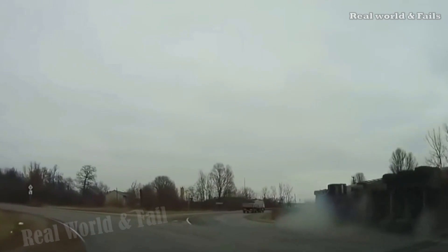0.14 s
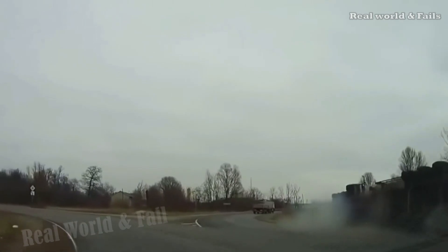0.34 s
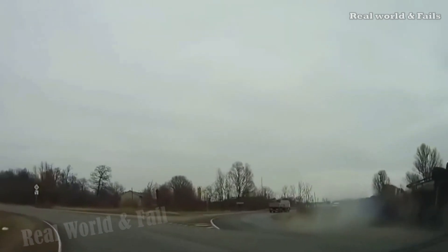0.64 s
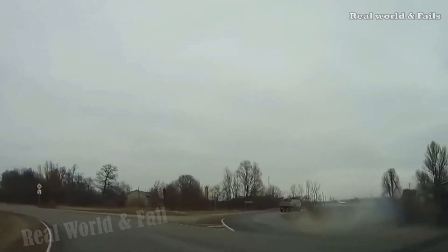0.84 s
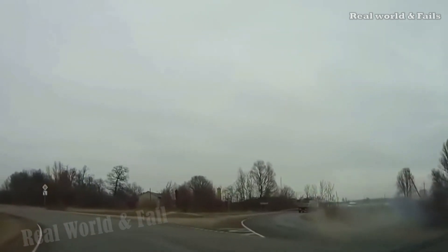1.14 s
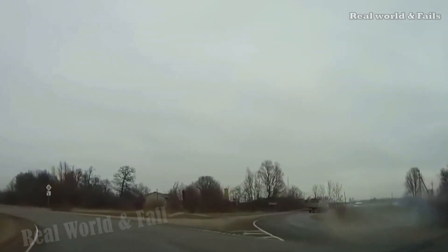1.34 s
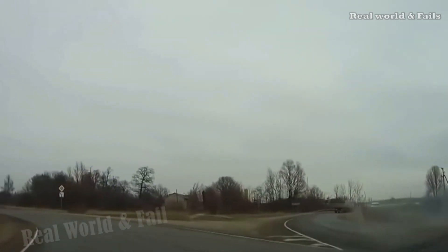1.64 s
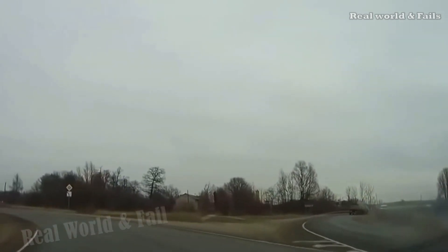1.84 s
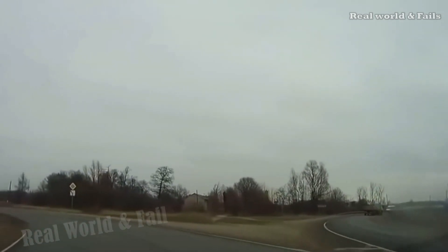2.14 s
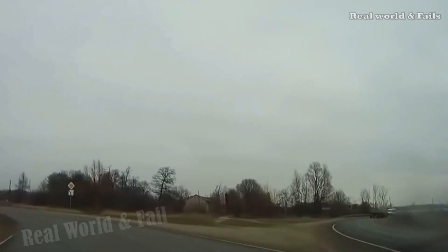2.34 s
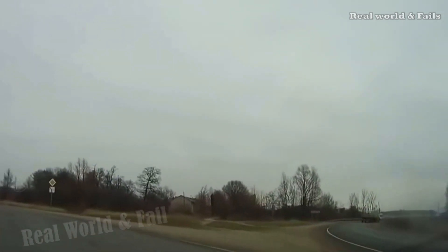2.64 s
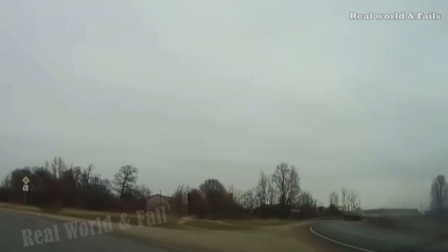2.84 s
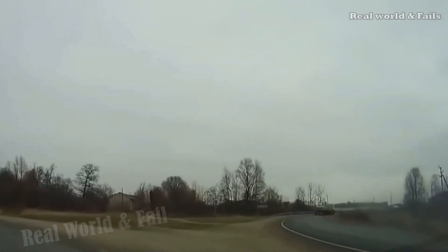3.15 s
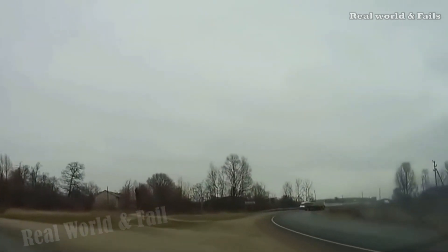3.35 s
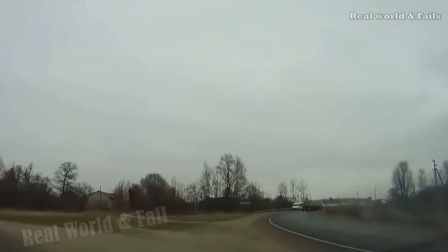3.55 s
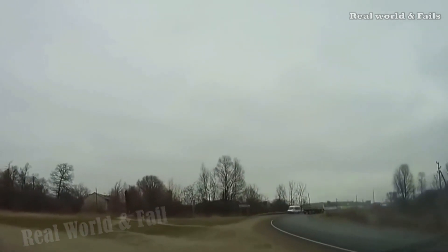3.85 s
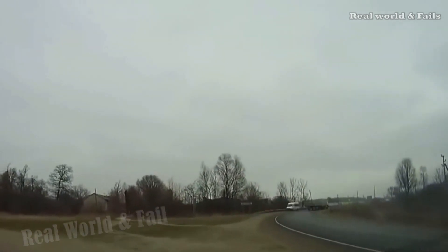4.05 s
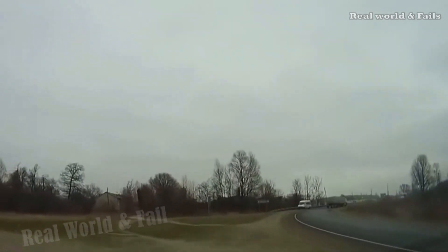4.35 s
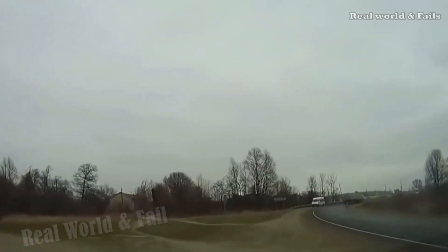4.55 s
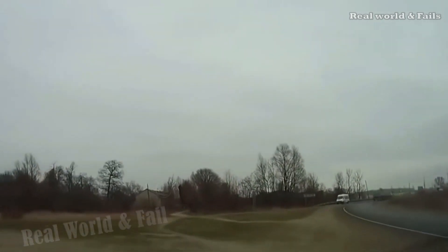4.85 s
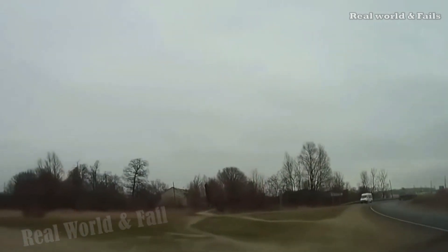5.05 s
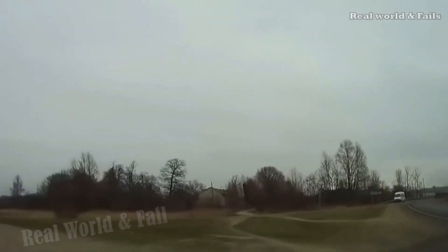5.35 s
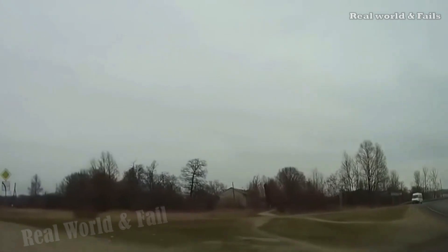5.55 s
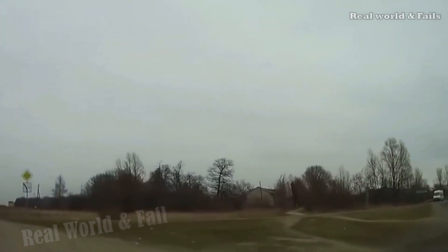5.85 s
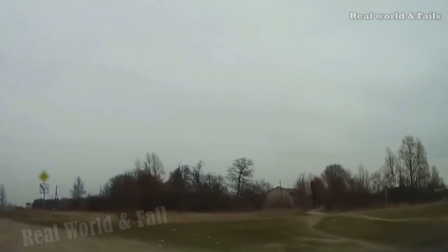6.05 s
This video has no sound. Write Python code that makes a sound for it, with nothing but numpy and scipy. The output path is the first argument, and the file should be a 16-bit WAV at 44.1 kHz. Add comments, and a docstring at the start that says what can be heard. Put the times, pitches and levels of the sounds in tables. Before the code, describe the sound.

From inside a moving car, a heavy overturned truck slides past close by: hollow shuddering boom, groaning steel, then an overloading slam with cracks and rattling panels. More lurches and knocks follow as the scrape turns from asphalt to gritty verge and dies quickly. A low engine drone and wide road rumble carry on, easing into a cruise with faint ticks, and dull wheel bumps come late.

```python
"""Inside a car that pulls through a turn past an overturned truck sliding along the road.
The truck groans, clatters and slams down, built from ringing noise, shuddering lows and sliding tones.
It overloads the microphone, scrapes on from asphalt to the gritty verge, and dies away as it slows.
The car eases into a cruise: engine harmonics climb under shaped noise for the road and tyres.
Small ticks sound in the cabin, and late on the wheels drop over bumps."""
import sys
import numpy as np
from scipy import signal
from scipy.fft import rfft, irfft
from scipy.io import wavfile
from scipy.ndimage import uniform_filter1d

SR = 44100
rng = np.random.default_rng(int(sys.argv[2]) if len(sys.argv) > 2 else 0)


def to_wav(s):
    """Save 16-bit WAV."""
    ch = np.atleast_2d(s).T  # columns
    pcm = np.round(np.clip(ch, -1, 1) * 32767)  # PCM
    wavfile.write(sys.argv[1], SR, pcm.astype(np.int16))


N = 272979
T = np.arange(N) / SR
HZ = np.fft.rfftfreq(N, 1 / SR)

# Every colour table is a spectrum curve, relative per Hz: freq_hz, level_db
# colours of the hollow truck body: sliding, and slamming down
BOOM_COLOUR = [(12, -36.5), (22, -1.5), (32, -4.5), (46, 6.5), (58, -2), (70, -16), (95, -12), (110, -4),
               (135, -16), (155, -19.5), (300, -98.5)]
SLAM_COLOUR = [(20, -21), (42, 8.5), (75, 1.5), (125, -5), (170, -18.5), (400, -20), (900, -67)]
# colour of the truck's rattling body
CLATTER_COLOUR = [(100, -33), (170, -1.5), (215, 1.5), (280, -3), (450, -3), (520, -15.5), (640, -7.5),
                  (760, -13), (1250, -19.5), (1700, -25), (2400, -33), (5000, -67)]
# colours of bare steel on asphalt, grit dragged under it, and grit flung against the glass
STEEL_COLOUR = [(500, -14), (1200, 6), (1800, 5.5), (2400, -7.5), (3200, -5.5), (4000, -14), (5000, -4),
                (6100, -13.5), (7200, -14), (8300, -29), (10000, -38), (16000, -48)]
GRIT_COLOUR = [(500, -11.5), (1300, 4.5), (2200, 2), (3200, 5.5), (4000, 3), (5200, -4.5), (6300, -11.5),
               (7200, -30.5), (8500, -40), (10000, -43.5), (16000, -51.5)]
SPRAY_COLOUR = [(500, -18), (1300, 5.5), (2200, 10.5), (3200, 4.5), (4000, 4.5), (5200, 3), (6400, -12.5),
                (7300, -50), (8500, -42), (16000, -46.5)]
# colours of road rumble and tyre roar: common to both sides, and differing between them
RUMBLE_COLOUR = [(15, -12.5), (33, -3.5), (55, -4), (74, 0), (88, -5.5), (115, 1.5), (150, -10.5),
                 (225, -7.5), (260, -10), (390, -12.5), (520, -19), (650, -22), (760, -40.5), (1500, -82.5)]
RUMBLE_SIDE_COLOUR = [(20, -21), (52, -6), (64, -13), (88, -4), (115, 3), (142, -9), (220, -3),
                      (280, -11.5), (420, -5.5), (560, -10.5), (700, -23.5), (1200, -64.5)]
TYRE_COLOUR = [(300, -31.5), (620, -16.5), (745, -6), (900, 0.5), (1200, -4), (1500, -16), (1830, -16.5),
               (1980, -21), (3200, -26.5), (4400, -39.5), (7000, -46.5), (9000, -55.5), (15500, -45.5)]
TYRE_SIDE_COLOUR = [(300, -22), (600, -9), (740, -6.5), (820, 4.5), (930, -1), (1250, -4.5), (1480, -12),
                    (1950, -14), (3300, -32), (4300, -43.5), (7000, -51.5), (9000, -57), (15500, -50)]
# colour of the tread's hiss
HISS_COLOUR = [(1200, -14.5), (2600, 1), (3400, -0.5), (4300, -12.5), (6500, -22), (9000, -36.5)]

# the truck digs into the road: start_s, hold_s, release_s, boom_db, clatter_db, scrape_db
DIGS = [(0.095, 0.19, .035, -23, -20.5, -36.5), (0.175, .1, 0.018, -17, -13, -29.5),
        (0.25, 0.0089, 0.011, -3, -17, -23), (0.343, 0.034, 0.012, -7.5, -30.5, -57),
        (0.515, 0.028, 0.083, -7.5, -19, -36), (0.624, 0.052, 0.026, -22, -27, -35),
        (0.788, 0.14, 0.043, -30.5, -19, -36.5), (0.888, 0.044, 0.036, -8.5, -22.5, -36.5),
        (0.976, .02, .02, -33, -34, -38.5), (1.116, .03, 0.028, -34, -34, -28.5),
        (1.195, 0.078, 0.031, -30, -34.5, -47.5)]
# heavy lurches of the truck's body: start_s, level_db, pitch_hz
LURCHES = [(.105, -7, 133), (.255, -8.5, 125.3), (.275, -20, 240.7), (0.329, -4, 37.1), (.51, -9, 47),
           (0.716, -6.5, 35.2), (.84, -18.5, 279), (0.886, -6, 131.6), (0.906, -9, 43.4)]
# knocks of the body on the road, before the panels ring: start_s, level_db
KNOCKS = [(0.116, -17.5), (.2, -25.5), (0.244, -10.5), (0.267, -26), (.305, -8.5), (.495, -20.5),
          (0.541, -34.5), (.647, -9), (0.691, -17.5), (0.848, -15.5), (.93, -22)]
# ringing of the truck's panels: pitch_hz, relative level_db, t60_s
PANELS = [(280.4, 3, 0.24), (380, -12, 0.037), (471, 6, 0.12), (514, 3, 0.11), (580, -12.5, 0.12),
          (636, -4, 0.1), (688, 3, 0.04), (807, -7.5, 0.2), (940, -14.5, 0.037), (1063, -6.5, .1),
          (1154, -9.5, 0.28), (1250, -13, 0.16), (1434, -11, .11), (1710, -13, 0.1), (1853, -11, 0.081),
          (1950, -17, .1), (2616, -14.5, .08), (3140, -17.5, 0.043), (5030, -22, .06)]
# sprays of grit: start_s, length_s, level_db
SPRAYS = [(0.193, 0.027, -40), (0.233, 0.038, -22.5), (0.62, 0.038, -51.5), (0.926, 0.022, -32.5),
          (1.113, 0.096, -37), (1.407, 0.023, -49), (1.467, 0.064, -50.5)]
# groans and squeals of dragged steel: start_s, hold_s, pitch_hz, level_db
JUDDERS = [(0, 0.46, 224.3, -24.5), (0.179, 0.037, 655, -18.5), (0.645, 0.1, 222.6, -20.5),
           (0.798, 0.072, 205, -25)]
# cracks of breaking parts: start_s, level_db, centre_hz
CRACKS = [(.2355, -22, 2320), (.245, -20, 1800), (.2505, -21, 5570), (.254, -17, 2785), (.2605, -11, 1500),
          (.2685, -9, 4960), (.2742, -22, 2600), (.2875, -20, 5490), (.305, -17, 1500)]
# engine harmonics: multiple of the firing rate, pulling_db, cruising_db
ENGINE_ORDERS = [(1, -25, -40), (2, -33, -37.5), (3, -66.5, -45), (4, -38, -53)]
# the car's wheels drop over bumps: start_s, level_db, pitch_hz
BUMPS = [(4.42, -18.5, 59), (4.725, -24, 107), (5.79, -19, 48), (5.875, -17, 63.7)]
# small ticks of flying grit and cabin trim: start_s, level_db, centre_hz
TICKS = [(.837, -48, 9900), (1.247, -58, 10100), (2.465, -63, 5030), (2.836, -59, 5200),
         (2.93, -63.5, 6350), (3.135, -65, 9000), (4.755, -69, 13600), (4.757, -55, 5600)]

# the truck's speed past the car, its closest distance and when; its drag fades once it slows
PASS_M_PER_S, DISTANCE_M, PASS_S = 10.7, 5.8, 0.18
SLOWING_S, SLOWING_DB_PER_S = 1.144, 51
# steady drag at the closest point; the scrape's also follows the settling and the verge
DRAG_BOOM_DB, DRAG_CLATTER_DB, DRAG_SCRAPE_DB = -9.5, -23, -39.5
DIG_ATTACK_S = 0.014
# the heaviest blow
SLAM_S, SLAM_DB, SLAM_ATTACK_S, SLAM_HOLD_S, SLAM_RELEASE_S = .225, 9, 0.016, 0.0027, 0.035
# the drag's scrape starts SETTLE_DB down and builds as the truck's weight comes down on the road
SETTLE_S, SETTLE_DB = 0.38, 11
# at the verge grit takes over (share 0-1 before and after) and the drag's scrape gets louder
VERGE_FROM_S, VERGE_TO_S, GRIT_ROAD, GRIT_VERGE, VERGE_DB = .58, .71, 0.084, 0.92, 2
JUDDER_ATTACK_S, JUDDER_RELEASE_S = 0.029, 0.042
JUDDER_SAG = 0.0409  # share of the pitch lost over attack and hold
# splinters crackle around the slam
SPLINTER_S, SPLINTER_HOLD_S, SPLINTER_RELEASE_S, SPLINTER_DB = .19, .11, .008, -51.5
# the engine's firing rate climbs towards a top value, with this time constant
FIRING_START_HZ, FIRING_TOP_HZ, SPEED_UP_S = 51.88, 63.4, 5.0
# the car pulls through the turn, then eases into a cruise
EASE_FROM_S, EASE_TO_S = 1.42, 3.01
# road noise: base level at the start, growth with speed, and extra while pulling through the turn
RUMBLE_DB, RUMBLE_DB_PER_S, RUMBLE_TURN_DB = -29.5, 0.4329, 6
TYRES_DB, TYRES_DB_PER_S, TYRES_TURN_DB = -51, 1.5, 5.5
HISS_DB, HISS_DB_PER_S = -89.5, 5.5
# upper edge of the microphone's band
EDGE_HZ = 16200


def boom():
    """The hollow truck body shudders as it slides, lurches, and slams down once."""
    body = shudder(BOOM_COLOUR, size=1800) * sliding(DRAG_BOOM_DB, dig_layer=0)
    slam_swell = swell(SLAM_S, SLAM_ATTACK_S, SLAM_HOLD_S, SLAM_RELEASE_S)
    slam = amp(SLAM_DB) * shudder(SLAM_COLOUR, size=1300) * slam_swell
    return body + thuds(LURCHES, swell_s=0.025) + slam


def clatter():
    """Knocks and a dense rattle of small blows ring the truck's panels."""
    blows = grains(per_s=370, spread_db=2.0) * sliding(DRAG_CLATTER_DB, dig_layer=1)
    t = T[:SR // 4]
    for start_s, level_db in KNOCKS:
        knock = rng.standard_normal(len(t)) * np.exp(-t / 0.029)
        add(blows, start_s, amp(level_db) * knock)
    ring = np.zeros(len(t))
    for pitch_hz, level_db, t60_s in PANELS:
        ring += amp(level_db - 60 * t / t60_s) * np.sin(2 * np.pi * (pitch_hz * t + rng.random()))
    ringing = signal.fftconvolve(blows, ring / np.linalg.norm(ring))[:N]
    rattle = blows.std() * colour(blows, CLATTER_COLOUR)
    return muffled(amp(-7.5) * ringing + amp(-2.0) * rattle, cut_hz=5200)


def scrape():
    """Steel grinds over asphalt, then grit, in uneven slips, and throws sprays of it."""
    verge = ramp(VERGE_FROM_S, VERGE_TO_S)
    unsettled = 1 - ramp(0, SETTLE_S)
    drag_db = DRAG_SCRAPE_DB + VERGE_DB * verge - SETTLE_DB * unsettled
    force = sliding(drag_db, dig_layer=2) * amp(1.5 * wander(40))
    steel = colour(patchy(grains(per_s=3200, spread_db=2.0), depth_db=3.5), STEEL_COLOUR)
    grit = colour(patchy(grains(per_s=7000, spread_db=2.0), depth_db=2.5), GRIT_COLOUR)
    grit_share = GRIT_ROAD + (GRIT_VERGE - GRIT_ROAD) * verge
    ground = np.sqrt(1 - grit_share) * steel + np.sqrt(grit_share) * grit
    return force * ground + sprays()


def sprays():
    """Flung grit strikes in short showers of equal-sized clicks."""
    strength = np.zeros(N)
    for start_s, length_s, level_db in SPRAYS:
        add(strength, start_s, amp(level_db) * signal.windows.tukey(int(length_s * SR), .45))
    return strength * colour(grains(per_s=3400, spread_db=0.0), SPRAY_COLOUR)


def judder(rough):
    """Dragged steel sticks and slips at a rough pitch that sinks as it slows."""
    out = np.zeros(N)
    waver = 1 + rough * wander(64)
    for start_s, hold_s, pitch_hz, level_db in JUDDERS:
        sag = 1 - JUDDER_SAG * ramp(start_s, start_s + JUDDER_ATTACK_S + hold_s)
        cycles = np.cumsum(pitch_hz * waver * sag) / SR
        envelope = swell(start_s, JUDDER_ATTACK_S, hold_s, JUDDER_RELEASE_S)
        out += amp(level_db) * envelope * np.sin(2 * np.pi * cycles)
    return out * amp(2.7 * wander(20))


def breaking():
    """Parts crack in short, broadly tuned bursts, dulled on the way into the car."""
    return muffled(snaps(CRACKS, sharpness=2, decay_s=.0018), cut_hz=7000)


def splinters():
    """Small parts shatter in sparse bright clicks."""
    bright = [(2000, -20), (5500, 0), (9000, -4), (15500, -6)]  # freq_hz, level_db
    clicks = colour(grains(per_s=400, spread_db=3), bright)
    envelope = swell(SPLINTER_S, .005, SPLINTER_HOLD_S, SPLINTER_RELEASE_S)
    return amp(SPLINTER_DB) * envelope * clicks


def engine():
    """Low harmonics of the firing rate make a drone that changes tone as the load eases."""
    climb = np.exp(-T / SPEED_UP_S)
    firing_hz = FIRING_TOP_HZ + (FIRING_START_HZ - FIRING_TOP_HZ) * climb
    firings = np.cumsum(firing_hz * (1 + 0.0094 * wander(17.4))) / SR
    load = pulling()
    drone = np.zeros(N)
    for order, pull_db, cruise_db in ENGINE_ORDERS:
        level_db = cruise_db + load * (pull_db - cruise_db) + 3.1 * wander(15)
        tone = np.sqrt(2) * np.sin(2 * np.pi * (order * firings + rng.random()))  # rms 1
        drone += amp(level_db) * tone
    return drone * amp([[-1.2], [1.2]])  # left, right


def road():
    """Rumble comes up through the suspension; tread roar comes through the glass, brightening with speed."""
    turn = pulling()
    rumble_db = RUMBLE_DB + RUMBLE_DB_PER_S * T + RUMBLE_TURN_DB * turn + 0.82 * wander(31)
    tyres_db = TYRES_DB + TYRES_DB_PER_S * T + TYRES_TURN_DB * turn + .5 * wander(25)
    rumble = cabin_pair(noise(), RUMBLE_COLOUR, RUMBLE_SIDE_COLOUR, side_db=-10.5, lead=.12)
    roar = patchy(noise(), depth_db=1.7)
    tyres = cabin_pair(roar, TYRE_COLOUR, TYRE_SIDE_COLOUR, side_db=3.0, lead=.35)
    tyres = tyres * amp([[.3], [-.3]])  # left, right
    hiss = np.array([colour(noise(), HISS_COLOUR) for _ in range(2)])
    return rumble * amp(rumble_db) + tyres * amp(tyres_db) + hiss * amp(HISS_DB + HISS_DB_PER_S * T)


def bumps():
    """The car's wheels drop and the hollow cabin answers with low thuds."""
    return thuds(BUMPS, swell_s=0.027)


def ticking():
    """Flying grit and cabin trim tick in tiny bright bursts."""
    return snaps(TICKS, sharpness=2.5, decay_s=.004)


def sliding(drag_db, dig_layer):
    """Slide strength: drag follows distance and slowing, plus digs (0 boom, 1 clatter, 2 scrape)."""
    near = DISTANCE_M / np.hypot(DISTANCE_M, PASS_M_PER_S * (T - PASS_S))
    drag = near * amp(drag_db - SLOWING_DB_PER_S * np.maximum(T - SLOWING_S, 0))
    power = drag ** 2
    for start_s, hold_s, release_s, *levels_db in DIGS:
        dig = amp(levels_db[dig_layer]) * swell(start_s, DIG_ATTACK_S, hold_s, release_s)
        power = power + dig ** 2
    return np.sqrt(power)


def pulling():
    """1 while the car pulls through the turn, 0 once it cruises."""
    return 1 - ramp(EASE_FROM_S, EASE_TO_S)


def shudder(points, size):
    """A random low vibration whose strength is held even over size samples."""
    x = colour(noise(), points)
    envelope = abs(signal.hilbert(x))
    return x / np.sqrt(uniform_filter1d(envelope ** 2, size=size) / 2)


def thuds(rows, swell_s):
    """Each jolt swells over a few swings of a hollow body and dies away."""
    out = np.zeros(N)
    t = T[:SR // 3]
    u = t / swell_s
    envelope = u ** 2 * np.exp(2 - 2 * u)  # peaks at 1 after swell_s
    for start_s, level_db, pitch_hz in rows:
        swing = np.sin(2 * np.pi * (pitch_hz * t + rng.random()))
        add(out, start_s, amp(level_db) * envelope * swing)
    return out


def snaps(rows, sharpness, decay_s):
    """Short noise bursts, each in one broad resonance."""
    out = np.zeros(N)
    t = T[:SR // 20]
    for start_s, level_db, centre_hz in rows:
        b, a = signal.iirpeak(centre_hz, sharpness, fs=SR)
        snap = unit(signal.lfilter(b, a, rng.standard_normal(len(t))))
        add(out, start_s, amp(level_db) * snap * np.exp(-t / decay_s))
    return out


def cabin_pair(drive, common, differing, side_db, lead):
    """Noise at two spaced ports; a quarter-cycle share in their difference lets the left one lead."""
    quarter_cycle = signal.hilbert(drive).imag
    apart = np.sqrt(1 - lead ** 2) * noise() - lead * quarter_cycle
    mid = colour(drive, common)
    side = amp(side_db) * colour(apart, differing)
    return np.array([mid + side, mid - side])


def muffled(x, cut_hz):
    """The treble of outside sounds is lost on the way in."""
    return signal.sosfilt(signal.butter(N=6, Wn=cut_hz, fs=SR, output="sos"), x)


def patchy(x, depth_db):
    """Lets the colour shift in small patches of time and frequency."""
    z = signal.stft(x, nperseg=1024, noverlap=768)[2]
    field = uniform_filter1d(rng.standard_normal(z.shape), size=4, axis=0)  # across frequency
    field = uniform_filter1d(field, size=9, axis=1)  # across time
    shifted = signal.istft(z * amp(depth_db * unit(field)), nperseg=1024, noverlap=768)[1]
    return unit(shifted[:N])


def grains(per_s, spread_db):
    """Clicks at random moments: many small, a few large; all equal if spread_db is 0."""
    size = amp(spread_db * np.minimum(rng.exponential(1, N), 4))
    struck = rng.random(N) < per_s / SR
    return unit(size * rng.choice([-1, 1], N) * struck)


def colour(x, points):
    """Shapes the spectrum of x by the points (freq_hz, level_db), at rms 1."""
    hz, db = np.transpose(points)
    curve_db = np.interp(np.log(HZ + 1), np.log(hz), db)
    return unit(irfft(rfft(x) * amp(curve_db), N))


def wander(rate):
    """Slow random drift of rms 1, mostly below rate in Hz."""
    return unit(irfft(rfft(noise()) / (1 + (HZ / rate) ** 4), N))


def noise():
    """White noise."""
    return rng.standard_normal(N)


def swell(start_s, attack_s, hold_s, release_s):
    """An envelope that rises at start_s, holds, and dies away."""
    past_hold_s = np.maximum(T - start_s - attack_s - hold_s, 0)
    return ramp(start_s, start_s + attack_s) * np.exp(-past_hold_s / release_s)


def ramp(from_s, to_s):
    """Goes from 0 to 1 between two times."""
    return np.clip((T - from_s) / (to_s - from_s), 0, 1)


def add(mix, start_s, sound):
    """Adds a sound to the mix at start_s, cut off at the end of the mix."""
    part = mix[round(start_s * SR):][:len(sound)]
    part += sound[:len(part)]


def amp(db):
    """Decibels to gain."""
    return 10 ** (np.asarray(db) / 20)


def unit(x):
    """Scales to rms 1."""
    return x / np.sqrt(np.mean(x ** 2) + 1e-20)


def scene():
    """The truck is heard in the middle, the engine and road across both sides."""
    truck = boom() + clatter() + scrape() + judder(rough=.032) + breaking() + splinters()
    car = engine() + road() + bumps() + ticking()
    return truck + car


def record(dry):
    """The microphone is clean up to a knee and rounds off the peaks above it; then the band limit."""
    knee = .72
    clean = np.clip(dry, -knee, knee)
    over = (dry - clean) / (1 - knee)
    rounded = clean + (1 - knee) * over / np.sqrt(1 + over ** 2)
    return signal.sosfilt(signal.ellip(10, .1, 80, EDGE_HZ, fs=SR, output="sos"), rounded)


dry = scene()
out = record(dry)
to_wav(out)
```